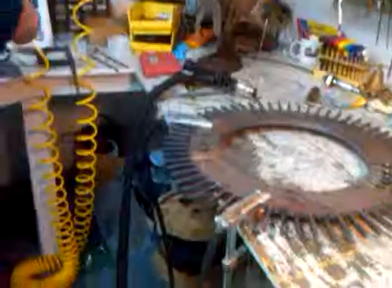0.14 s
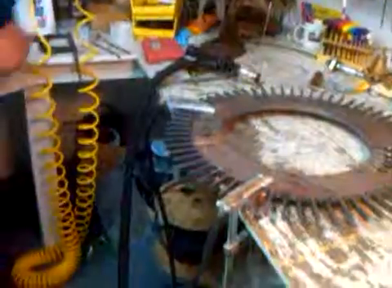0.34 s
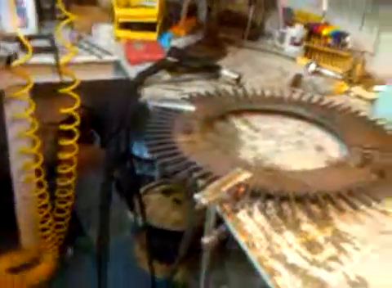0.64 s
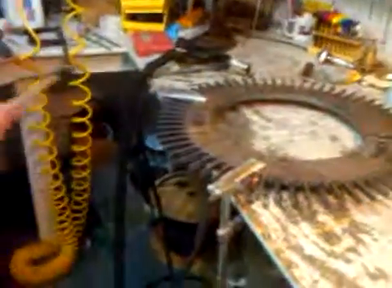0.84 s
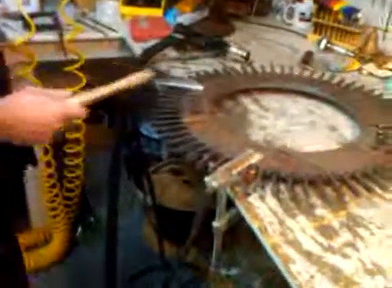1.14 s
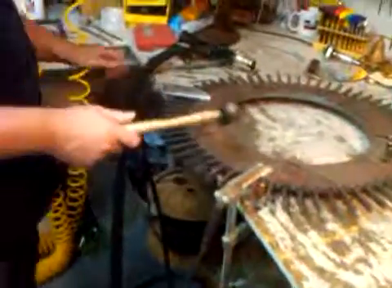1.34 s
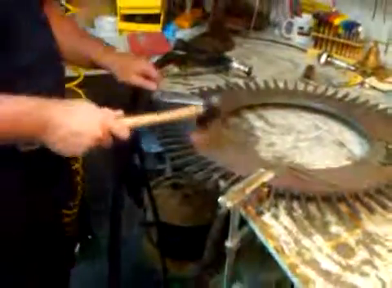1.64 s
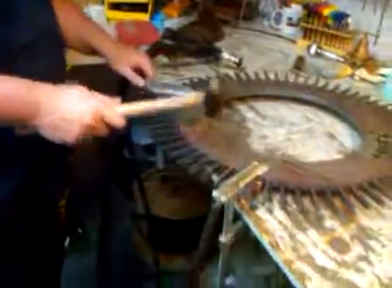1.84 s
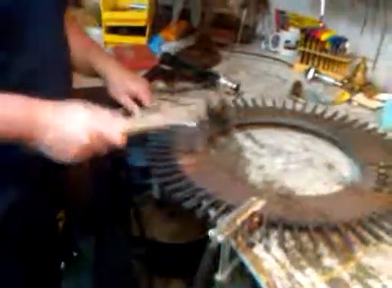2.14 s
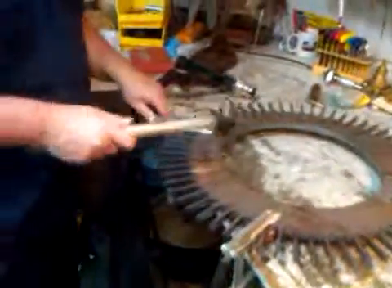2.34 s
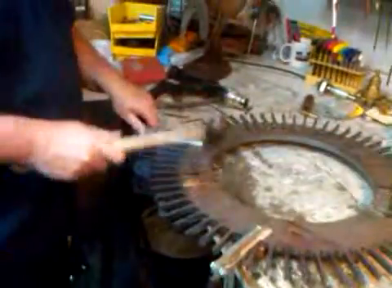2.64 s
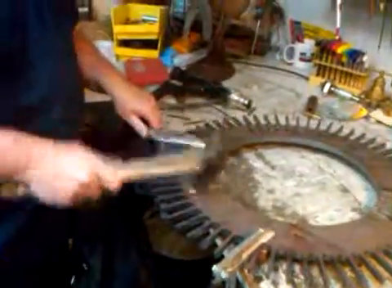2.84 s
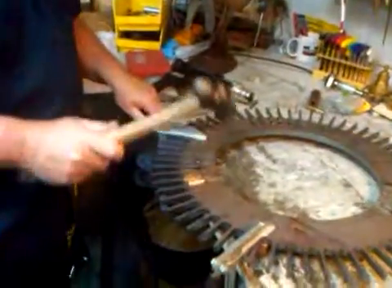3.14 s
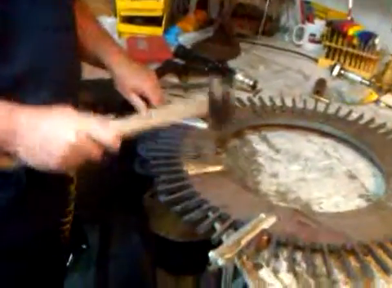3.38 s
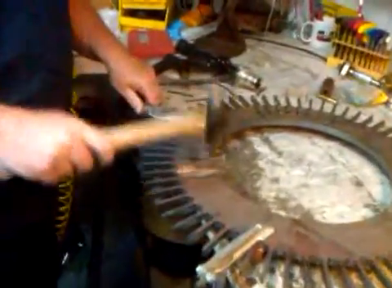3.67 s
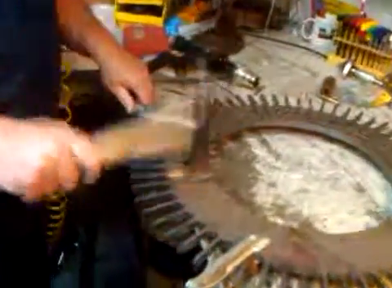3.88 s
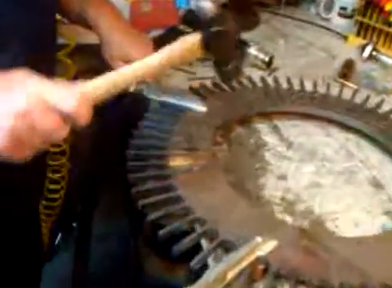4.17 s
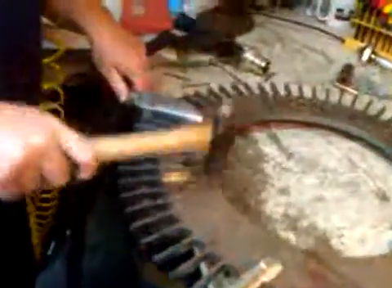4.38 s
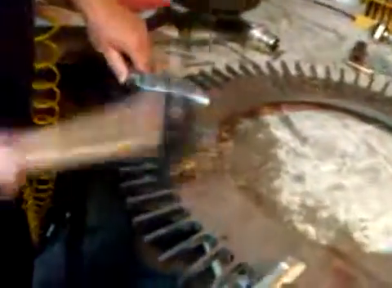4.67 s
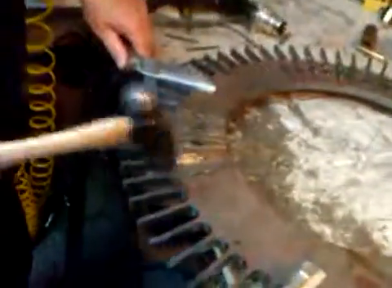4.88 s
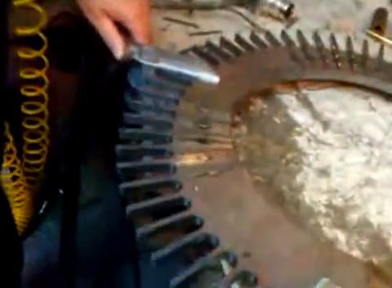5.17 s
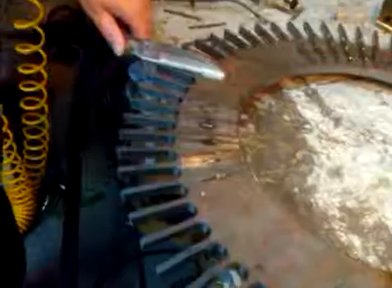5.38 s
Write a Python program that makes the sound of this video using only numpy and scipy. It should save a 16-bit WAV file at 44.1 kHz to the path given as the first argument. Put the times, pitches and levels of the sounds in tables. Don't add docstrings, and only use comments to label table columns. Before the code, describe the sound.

After quiet shuffling and small ticks, a hammer strikes a metal fin ten times, each crashing loudly with gear ring and bench thud.

```python
import sys
import numpy as np
from scipy import signal
from scipy.io import wavfile
from scipy.ndimage import uniform_filter1d, minimum_filter1d

SR = 44100
rng = np.random.default_rng(int(sys.argv[2]) if len(sys.argv) > 2 else 0)


def bounce(signal):
    frames = np.transpose(np.atleast_2d(signal))
    limited = np.clip(frames, -1, 1)
    pcm = np.round(limited * 32767).astype(np.int16)
    wavfile.write(sys.argv[1], SR, pcm)


def nominal_scale(level):
    x = np.asarray(level, float) / 20
    return 10 ** x


N = 243187

# (pitch [Hz], density [dB per Hz])
AIR_COLOUR = [(12, -26.5), (20, 6), (59, -3.5), (127, -5.5), (204, -17.5), (377, -2.5), (417, -10.5),
              (753, -21.5), (1230, -22), (1470, -21.5), (2530, -28), (6140, -25), (7300, -31), (9490, -53),
              (16100, -120)]
AIR_DB = -54.5
# (pitch [Hz], level [dB])
MOTOR_HUM = [(123.8, -64), (339.1, -64), (748.3, -71), (1495, -68.5), (2213, -79.5), (2988, -78.5)]
# (pitch [Hz], density [dB per Hz])
SCUFF_COLOUR = [(24, -48), (40, -21), (75, -32.5), (114, 4.5), (239, -0.5), (490, -11), (774, -10),
                (1030, -14.5), (1520, -15.5), (7300, -46), (9490, -72.5), (16100, -120)]
HISS_COLOUR = [(300, -8.5), (1500, -3), (4300, -13), (7500, -8)]
# (loudest at [s], rise [s], fall [s], level [dB], share of hiss [dB])
RUSTLES = [
    (.11, 0.013, 0.22, -55, -33),
    (0.296, 0.032, 0.025, -44.5, -6),
    (.35, .02, .03, -46, -13.5),
    (1.758, 0.012, .08, -54.5, 6),
    (3.75, 0.57, .25, -49.5, -21.5),
    (4.8, 0.35, 0.21, -45, -23),
]
STIR_DB, STIR_HISS_DB = -60, -13
# (time [s], pitch [Hz], level [dB], time to fall 60 dB [s])
TICKS = [
    (0.096, 1490, -51, 0.017),
    (0.252, 773, -41, 0.37),
    (.598, 3300, -57, .02),
    (1.417, 4183, -59, 0.13),
    (1.419, 5496, -52, 0.1),
    (1.739, 1610, -43.5, 0.026),
    (1.739, 2186, -46, 0.018),
    (1.738, 1217, -41.5, 0.01),
    (1.74, 890, -48, .04),
]

# (time [s], force [dB], bench thud [dB], ring passed to the gear [dB],
# landing place along the fin [0-1])
BLOWS = [
    (1.8325, -3, -12.5, -5, .6),
    (2.1634, -6.5, 2, -4.5, .1),
    (2.4941, -3.5, 0.5, 2, .05),
    (2.823, -1, -5.5, 2, 0.93),
    (3.1604, -1.5, -1.7, 1.95, 0.07),
    (3.4961, -3.5, -0.2, -3, 0.72),
    (3.8358, -0.44, -2, 1.5, .02),
    (4.188, -0.5, -1.9, 1.1, .26),
    (4.5747, 0, -2.5, 4, 0.34),
    (4.97, 2, -5.5, 15, 0.3),
]
# (pitch [Hz], level [dB], time to fall 60 dB [s])
GEAR_MODES = [
    [(1243, 0, 1.3), (1257, -4, 1.5), (1323, -13, 3), (1391, -13, 1.9)],
    [(1640, -7, 2), (1659, 0, 2.6), (1672, -1, 2.2), (1684, -6, 2)],
    [(2405, -3, .4), (2455, -1, .5), (2494, -2, .9), (2522, -5, .8), (2547, -4, 1), (2576, -5, 1.2),
     (2597, -5, 1.5), (2628, -2, 1.5), (2646, -5, 2), (2663, -3, 2), (2681, -3, 2.2)],
    [(3310, -18, 1.5), (3540, -7, 1), (3560, 0, .9), (4298, -6, 1.2), (4332, -9, 1.2), (4520, -20, 1.5),
     (5060, -15, 1.5), (5950, -18, 1.6), (6060, -20, 1.6), (5340, -12, 1.3), (6840, -24, 2), (7020, -25, 2),
     (5010, -16, 1.3)],
    [(5200, -10, .46), (5437, 1, .62), (5515, 0, .62)],
    [(7275, 0, .5), (7350, -9, .5)],
]
FIN_HZ = [750, 1135, 1465, 1565, 1776, 2191, 2269, 2360, 2450, 3080, 3390, 3965, 4264, 4665, 5050, 6635]
# (level [dB], time to fall 60 dB [s])
FIN_MODES = [(-5.5, 0.17), (-5, 0.24), (-4.5, 0.18), (-23, 0.1), (-3, 0.04), (-13, 0.068), (-2, 0.17),
             (-8.5, 0.15), (-11, 0.23), (-17.5, .25), (-9, .15), (-5.5, 0.12), (-17, 0.057), (-12.5, 0.16),
             (-9.5, 0.16), (-15, 0.22)]
# (pitch [Hz], level [dB], time to fall 60 dB [s])
BENCH_MODES = [(123.2, -13.5, .4), (158, -1, 0.22), (216.8, -3.5, 0.2), (344, -4, 0.16), (394.5, 1.5, 0.22),
               (432.4, -10, 0.32)]
# (level [dB], share of the ring level [dB per dB], place of the crest [0-1])
EXCITE = [(-26, .39, 0.72), (-32, 1.01, 0), (-34.5, .66, 0), (-42, 1.03, 0), (-28.5, 0.35, .43),
          (-21.5, -0.048, .35), (.5, .45, .69)]
HALF_WAVES = [1, 0, 0, 0, 1, 2, 1]
NODE_LEAK = .07
# (pitch [Hz], density [dB per Hz])
CRASH_COLOUR = [(18, -55), (30, -23), (97, -9.5), (164, -5.5), (653, -9), (733, -4.5), (1030, -8),
                (1460, -8.5), (2980, -16.5), (4020, -15), (7300, -26.5), (9490, -61.5), (16100, -120)]
# (pitch [Hz], time to fall 60 dB [s])
CRASH_T60 = [(60, .3), (260, 0.3), (700, 0.25), (1840, .22), (4000, 0.18), (7000, 0.16)]
# (pitch [Hz], time to fall 60 dB [s])
ECHO_T60 = [(60, 1), (400, .9), (1500, 0.24), (3500, 0.49), (7000, 0.27)]
ECHO_DB = -26
BRIGHT_DB_PER_OCT, BRIGHT_PER_THUD = 1.08, -0.17
LASTING, LASTING_PER_DB = 0.98, 0.0315

RATE, FRAME, FIRST = 16000, 1024, 213
# (from [s], to [s])
SHORT_SPANS = [
    (1.805, 2.317),
    (2.445, 3.341),
    (3.469, 3.661),
    (3.789, 4.045),
    (4.173, 4.429),
    (4.557, 4.813),
    (4.941, 6),
]
# (pitch [Hz], step [dB])
ROUNDING_STEP = [(100, -12), (500, -11), (1500, -8), (2600, -7), (5000, -7), (7000, -6)]
CHIRP_DB, CHIRP_WHIM_DB, CHIRP_LEAST_DB, CHIRP_FROM_HZ = -5.5, 3.5, -57.5, 6890


def evened(x):
    return x / np.sqrt(np.mean(x ** 2) + 1e-20)


def read(points, hz):
    f, value = np.transpose(points)
    return np.interp(np.log(hz + 1), np.log(f + 1), value)


def add(mix, s, sound):
    part = mix[round(s * SR):][:len(sound)]
    part += sound[:len(part)]


def noise(shape, n, size=256, patchy_db=0.):
    hz = np.fft.rfftfreq(size, 1 / SR)
    t = np.arange(n * 4 // size + 5) * size / 4 / SR
    real, imag, drift = rng.standard_normal((len(t), len(hz), 3)).T
    drift = uniform_filter1d(drift, size=6, axis=0)
    patches = evened(uniform_filter1d(drift, size=10, axis=1))
    spectra = (real + 1j * imag) * nominal_scale(shape(hz[:, None], t) + patchy_db * patches)
    return signal.istft(spectra, nperseg=size, noverlap=size * 3 // 4)[1][:n]


def steady_noise(colour, size, patchy_db):
    return evened(noise(lambda hz, s: read(colour, hz) + 0 * s, N, size, patchy_db))


def modes(table, t, spread_db, detune, lasting=1):
    hz, db, t60 = np.transpose(table)[:, :, None]
    strength, shift, start = rng.standard_normal((len(table), 3)).T[:, :, None]
    t = t.astype(np.float32)
    hz = (hz * (1 + detune * shift)).astype(np.float32)
    db = (db + spread_db * strength).astype(np.float32)
    slope = (60 / t60 / lasting).astype(np.float32)
    turns = (hz * t + start.astype(np.float32)) % 1
    decay = np.exp((db - slope * t) * np.float32(np.log(10) / 20))
    return (decay * np.sin(np.float32(2 * np.pi) * turns)).sum(0)


def motor_hum(t):
    out = np.zeros(N)
    for hz, db in MOTOR_HUM:
        waver = evened(uniform_filter1d(rng.standard_normal(N), size=2500))
        out += nominal_scale(db + 2 + 3 * waver) * np.sin(2 * np.pi * hz * t + 1.2 * waver)
    return out


def shuffling(t):
    scuff = steady_noise(SCUFF_COLOUR, 512, 3.5)
    hiss = steady_noise(HISS_COLOUR, 512, 3.5)
    out = nominal_scale(STIR_DB) * (scuff + nominal_scale(STIR_HISS_DB) * hiss)
    for s, rise, fall, level_db, hiss_db in RUSTLES:
        swell = np.exp(-.5 * ((t - s) / np.where(t < s, rise, fall)) ** 2)
        out += nominal_scale(level_db) * swell * (scuff + nominal_scale(hiss_db) * hiss)
    return out


def shop():
    t = np.arange(N) / SR
    out = nominal_scale(AIR_DB) * steady_noise(AIR_COLOUR, 2048, 1.0)
    out += motor_hum(t)
    out += shuffling(t)
    for s, *mode in TICKS:
        add(out, s, modes([mode], t[:9000], spread_db=-3.5, detune=0))
    return out


def crash_and_echo(n, thud_db, damping):
    bright = np.clip(BRIGHT_DB_PER_OCT + BRIGHT_PER_THUD * thud_db, -3, 4)

    def colour(hz):
        return read(CRASH_COLOUR, hz) + bright * np.log2(hz / 1000 + .1)

    def crash_shape(hz, s):
        return colour(hz) - 60 * s / (damping * read(CRASH_T60, hz))

    def echo_shape(hz, s):
        return colour(hz) + ECHO_DB - 60 * s / read(ECHO_T60, hz)

    crash = noise(crash_shape, n, patchy_db=2.5)
    echo = noise(echo_shape, n, size=512, patchy_db=2.0)
    return (crash + echo) / np.std(crash[:1000])


def bench_thud(t):
    return modes(BENCH_MODES, t, spread_db=3.0, detune=0.0088) * (1 - np.exp(-t / 0.0018))


def fin_clang(t, damping):
    decays = np.minimum(FIN_MODES, [9, .26])
    return modes(np.c_[FIN_HZ, decays], t, spread_db=2.5, detune=.002, lasting=damping / .85)


def gear_ring(t, ring_db):
    return sum(nominal_scale(db) * modes(group, t, spread_db=1.5, detune=.0015)
               for db, group in zip(ring_db, GEAR_MODES))


def blow(force_db, thud_db, ring_db, place, until):
    n = round(.7 * SR)
    t = np.arange(n) / SR
    damping = LASTING + LASTING_PER_DB * force_db
    base_db, share, crest = np.transpose(EXCITE)
    swing = abs(np.cos(np.pi * np.array(HALF_WAVES) * (place - crest))) + NODE_LEAK
    *group_db, clang_db = base_db + share * ring_db + 20 * np.log10(swing)
    body = crash_and_echo(n, thud_db, damping)
    body += nominal_scale(clang_db) * fin_clang(t, damping)
    body += nominal_scale(thud_db) * bench_thud(t)
    gear = gear_ring(t[t < until], group_db)
    fade = (1 - t / t[-1]) * np.minimum(t / .0006, 1)
    return nominal_scale(force_db - 1.0) * body * fade + np.pad(gear, (0, n - len(gear)))


def scene():
    mix = shop()
    next_times = [row[0] for row in BLOWS[1:]] + [9]
    for (s, *strike), after in zip(BLOWS, next_times):
        add(mix, s, blow(*strike, after - s))
    return mix[None]


def overload(x, ceiling=.75):
    return ceiling * np.tanh(abs(x / ceiling) ** 3) ** (1 / 3) * np.sign(x)


def chirps(low, short):
    highpass = signal.butter(6, CHIRP_FROM_HZ, "high", fs=RATE, output="sos")
    treble = signal.sosfilt(highpass, low)
    tail = (treble ** 2).reshape(-1, FRAME)[:, -FRAME // 4:].mean(1)
    db = 10 * np.log10(tail + 1e-12) + CHIRP_DB + CHIRP_WHIM_DB * rng.standard_normal(len(tail))
    blip = np.sin(np.pi * np.arange(256) / 256) ** 2 * (-1) ** np.arange(256)
    marks = np.zeros(len(low))
    marks[FRAME - 192::FRAME] = nominal_scale(db + 6) * (db > CHIRP_LEAST_DB) * short[FRAME - 192::FRAME]
    return signal.oaconvolve(marks, blip)[:len(low)]


def coarse(x, hop, extra_db, mask_db, width_hz, whim_db, alpha, top_hz):
    k, n = np.arange(hop) + .5, np.arange(2 * hop) + .5
    window = signal.windows.kaiser_bessel_derived(2 * hop, np.pi * alpha)
    basis = window[:, None] * np.cos(np.pi / hop * np.outer(n + hop / 2, k)) * np.sqrt(2 / hop)
    padded = np.pad(x, (hop // 2, 2 * hop))
    blocks = np.lib.stride_tricks.sliding_window_view(padded, 2 * hop)[::hop][:len(x) // hop]
    z, hz = blocks @ basis, k * RATE / 2 / hop
    power = (z ** 2).reshape(-1, FRAME // hop, hop)
    band = abs(uniform_filter1d(power, size=round(width_hz / hz[0] / 2), axis=2)).max(1)
    hiding = nominal_scale(2 * mask_db) * band.mean(1)[:, None] * np.minimum(hz / 1600, 1) ** 4
    masked = band + hiding + 1e-14
    whim = rng.standard_normal((len(x) // 256, 16)).repeat(hop // 16, axis=1)
    whim = whim[np.arange(len(z)) * hop // 256] * hz / hz[-1]
    step_db = read(ROUNDING_STEP, hz) + extra_db + whim_db * whim
    step = np.sqrt(masked).repeat(FRAME // hop, axis=0) * nominal_scale(step_db)
    rounded = np.floor(abs(z / step) ** .75 + .4054) ** (4 / 3)
    z = np.sign(z) * rounded * step * (hz < top_hz)
    parts, out = z @ basis.T, np.zeros((len(blocks) + 1, hop))
    out[:-1] += parts[:, :hop]
    out[1:] += parts[:, hop:]
    return out.ravel()[hop // 2:][:len(x)]


def camera_rounding(low):
    t = (np.arange(len(low)) + FIRST - FRAME) / RATE
    inside = sum((t > a) & (t < b) for a, b in SHORT_SPANS) * 1.
    short = uniform_filter1d(inside, size=128)
    calm = low * (1 - minimum_filter1d(short, size=257))
    out = short * coarse(low, FRAME // 8, extra_db=0, mask_db=-9, width_hz=450, whim_db=6,
                         alpha=3, top_hz=7420)
    out += (1 - short) * coarse(calm, FRAME, extra_db=3, mask_db=-15, width_hz=500, whim_db=2,
                                alpha=1.5, top_hz=7240)
    return out + chirps(low, short)


def band_limit(x):
    return signal.sosfilt(signal.butter(12, 8710, fs=SR, output="sos"), x)


def record(dry):
    clipped = overload(dry[0])
    thinned = signal.lfilter(*signal.butter(1, 38, "high", fs=SR), clipped)
    low = signal.resample_poly(thinned, 160, 441)
    low = np.pad(low, (FRAME - FIRST, -(len(low) - FIRST) % FRAME))
    rough = camera_rounding(low)[FRAME - FIRST:]
    leaky = signal.firwin(441 * 24 + 1, 7900, window=("kaiser", 5.2), fs=RATE * 441)
    up = signal.resample_poly(rough, 441, 160, window=leaky)[:N]
    return band_limit(np.clip(up, -1, 1)[None])


dry = scene()
out = record(dry)
bounce(out)
```